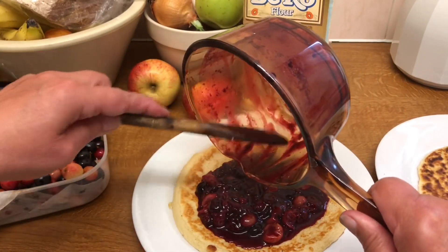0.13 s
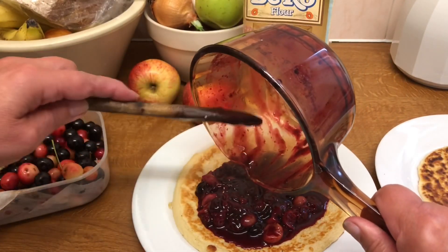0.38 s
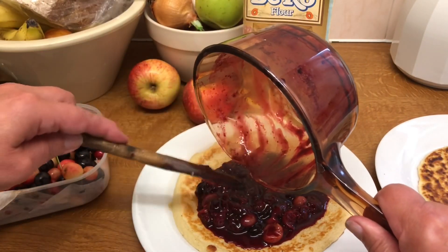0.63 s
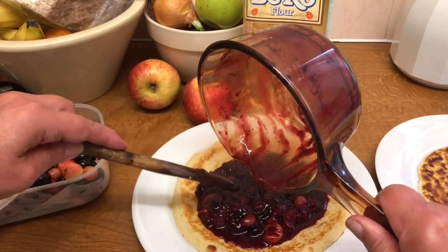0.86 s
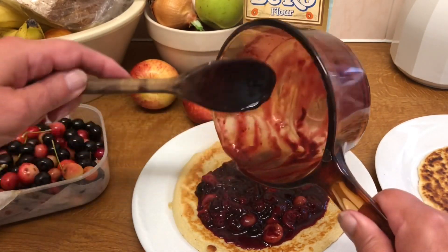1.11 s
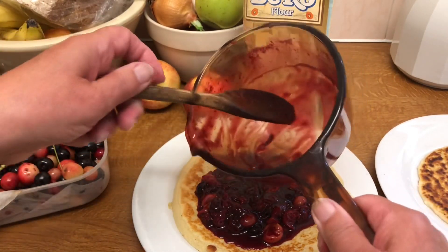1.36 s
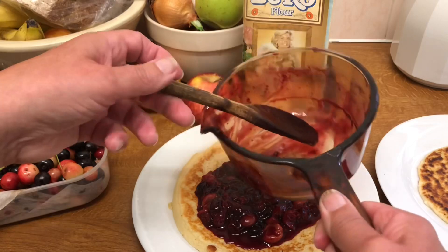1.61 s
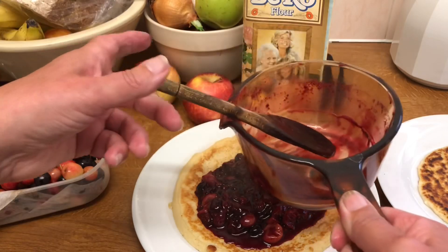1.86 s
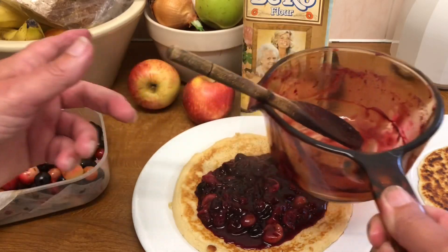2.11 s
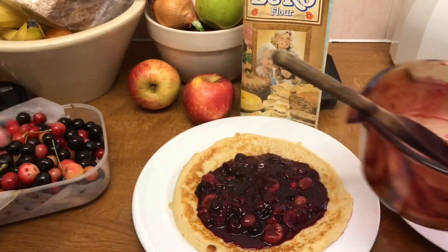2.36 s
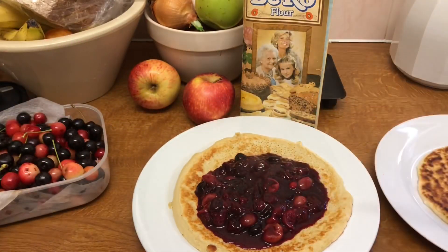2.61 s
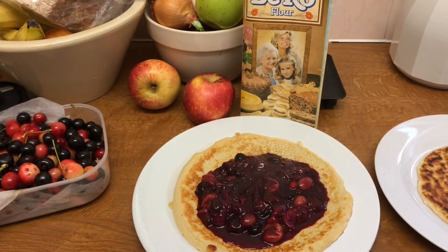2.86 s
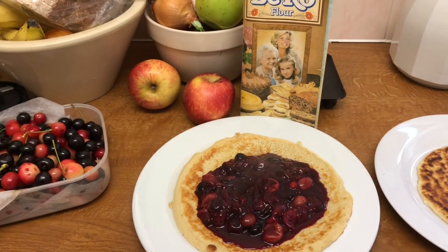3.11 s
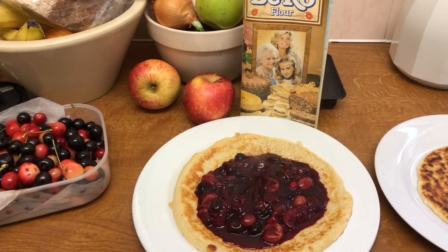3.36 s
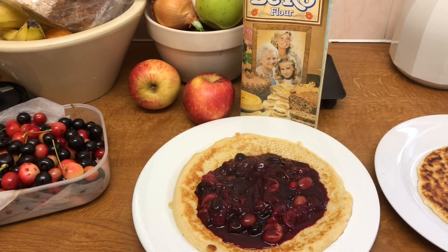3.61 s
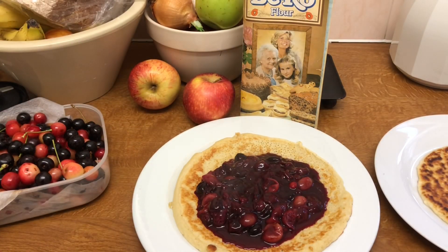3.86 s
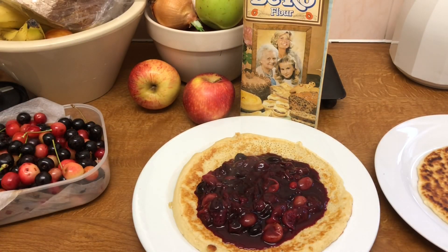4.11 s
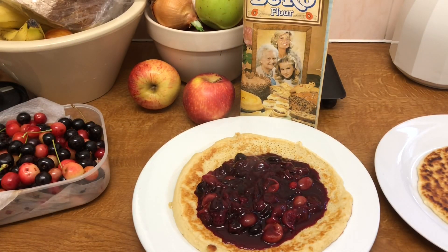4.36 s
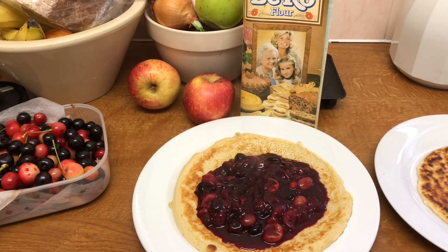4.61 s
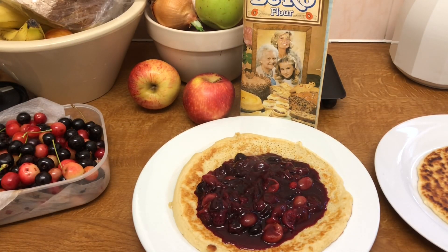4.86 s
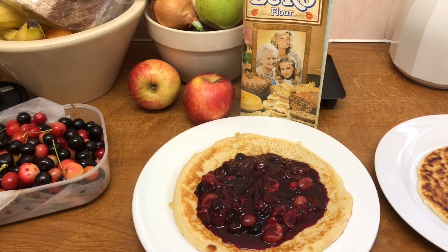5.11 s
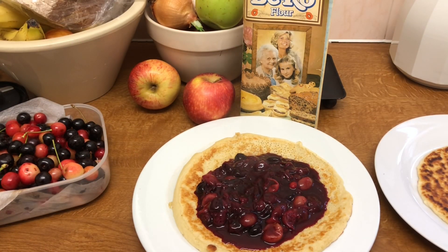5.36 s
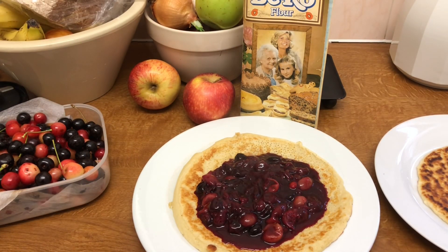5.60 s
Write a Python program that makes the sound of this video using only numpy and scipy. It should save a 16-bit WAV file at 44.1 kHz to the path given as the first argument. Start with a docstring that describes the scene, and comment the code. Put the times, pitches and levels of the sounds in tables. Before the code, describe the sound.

Small kitchen, phone microphone near the pan. First come dull glassy taps and brief wet wood-on-glass scrapes, then the brightest clatter as the spoon falls against the glass and bounces. A near-silent pause with tiny ticks follows, then off-screen woody thuds of a pan being set down, two of them strong, finishing with small rustles and a faint scrape over low hum and hiss.

```python
"""A wooden spoon taps and scrapes the sauce out of a hand-held glass saucepan, then drops into it and bounces.
Each tap rings damped glass modes and a hollow tok; scrapes are gritty noise that stirs the glass and squeaks.
Further off, heavy knocks of the pan being set down ring worktop panels and fill a small hard kitchen with echo.
Rustles and ticks are short filtered noise; shaped noise makes the low hum and hiss behind it all."""
import sys
import numpy as np
from scipy import signal
from scipy.fft import rfft, irfft
from scipy.io import wavfile
from scipy.ndimage import uniform_filter1d

SR = 44100
rng = np.random.default_rng(int(sys.argv[2]) if len(sys.argv) > 2 else 0)


def invert_db(level):
    """Linear amplitude ratio for a level in decibels (20 dB per decade), elementwise."""
    return 10 ** (np.asarray(level, dtype=float) / 20)


def to_wav(sig):
    """Store sig (one row per channel, or 1-D mono) as 16-bit WAV at the path in sys.argv[1].

    Samples outside -1..1 are clipped; the rate is SR.
    """
    pcm = np.clip(np.atleast_2d(sig), -1, 1) * 32767
    pcm = np.round(pcm).astype(np.int16)
    wavfile.write(sys.argv[1], SR, pcm.T)  # frames by channels


N = 252693
TIME = np.arange(N) / SR

# The saucepan in families of modes that share nodes; the hand and the sauce damp the bowl.
# Each row of a family: frequency in Hz, relative level in dB, 60 dB decay in s before modes() shortens it.
GLASS = [
    [(330, 1.5, 0.03), (433, -2.5, 0.049), (807, 9, 0.073), (927, 5.5, 0.14), (1390, 4.5, 0.022)],
    [(1540, -39, 0.03), (1740, 0.5, 0.013), (1840, -22, 0.085), (1826, 22.5, 0.021), (2052, 11, 0.021),
     (2200, -3.5, 0.059), (2500, -28, 0.0082)],
    [(3043, 9, 0.14)],
    [(3347, 20, 0.015), (3186, 8.5, 0.038), (3600, -6, .03)],
    [(3773, -4, 0.18)],
    [(4100, 1.5, 0.011), (4630, -0.5, 0.017), (4985, 9, 0.058), (5410, -2, 0.044)],
    [(5920, 9.5, 0.011), (6320, -10, 0.031), (6310, 5, 0.073), (6970, -14, 0.042)],
    [(8670, -9, 0.13), (8690, 5, 0.053), (10000, -15, 0.0097), (10500, -17, 0.0147), (11740, -9, .02),
     (14000, -16, .008)],
]


def unit(x):
    """Scale to rms 1."""
    return x / np.sqrt(np.mean(x ** 2))


def band(x, lo_hz, hi_hz):
    """Band-pass."""
    sos = signal.butter(2, [lo_hz, min(hi_hz, .45 * SR)], "band", fs=SR, output="sos")
    return signal.sosfilt(sos, x)


def modes(x, table, shorten=0.7, turn=1):
    """Ring a bank of damped resonators; a negative turn starts neighbours in opposite directions."""
    out = 0
    for k, (hz, db, t60) in enumerate(table):
        decay_s = min(t60, .6) * shorten
        pole = np.exp(2j * np.pi * hz / SR - np.log(1000) / (decay_s * SR))
        ring = signal.lfilter([0, pole.imag], [1, -2 * pole.real, abs(pole) ** 2], x)
        out = out + turn ** k * invert_db(db) * ring
    return out


def add(x, s, piece):
    """Mix a piece in at a time in seconds."""
    i = int(s * SR)
    x[i:i + len(piece)] += piece[:len(x) - i]


def push(ms):
    """Contact force of unit impulse that peaks after ms and relaxes; softer contact pushes longer."""
    t = np.arange(SR // 50) * 1000 / SR / ms
    force = t * np.exp(-t)
    return force / force.sum()


def crack(ms):
    """A burst of noise that dies 60 dB in ms."""
    t = np.arange(SR // 20) / SR
    return rng.standard_normal(len(t)) * 1000. ** (-t * 1000 / ms)


def grit(rate, spread_db):
    """Random clicks of uneven size, about rate per second, rms 1."""
    clicks = (rng.random(N) < rate / SR) * rng.standard_normal(N)
    return unit(clicks * invert_db(spread_db * rng.exponential(size=N)))


def stroke(start_s, length_s):
    """Pressure 0-1 of a stroke that presses on, holds and lets go."""
    rise_s, fall_s = 0.013, 0.027
    t = TIME - start_s
    press = np.clip(t / rise_s, 0, 1) ** 2
    return press * np.exp(-np.clip(t - length_s + fall_s, 0, None) / fall_s * 2)


def stutter():
    """Uneven grip: the level jumps about, 1.5 dB rms, as noise smoothed over 1/74 s."""
    return invert_db(1.5 * unit(uniform_filter1d(rng.standard_normal(N), int(SR / 74))))


def taps():
    """Each spot on the glass stirs the families of modes in its own mix; a harder or edge-on blow rings brighter."""
    # Spoon on glass. Each row: time in seconds, spot, tok peak in dB, tok pitch in Hz,
    # dB that all families but the lowest gain, dB that the spoon's hard edge adds.
    tap_rows = [(0.068, "lip", -27.5, 1094, -1, 5), (0.45, "sauce", -29, 1140, 10.5, 2.5),
                (0.57, "sauce", -38, 894, -7, 34), (0.593, "sauce", -27.5, 1020, -0.5, -5),
                (0.761, "sauce", -34, 1104, -3, 38.5), (1.383, "wall", -13.5, 1033, -1, 2),
                (1.717, "wall", -17.5, 1060, -0.5, 19), (1.764, "rim", -17.5, 1054, -0.5, 1),
                (1.892, "rim", -24.5, 1066, -11.5, 4), (5.477, "lip", -68, 1200, 3, 14)]
    # Where the spoon meets the pan. Each entry: tok decay in cycles before modes() shortens it,
    # level in dB above the tok for each family of GLASS.
    spot_mixes = {"lip": (9.5, [-10.5, 3.5, -13, -18, -28, -21, -20.5, -24]),
                  "sauce": (13.5, [-4.5, -19.5, -35, -42, -54, -59, -45.5, -37]),
                  "wall": (9.3, [-9.5, -4, -29, -10.5, -47, -6.5, -20, -28.5]),
                  "rim": (8.4, [-13.5, -1, -24, -2.5, -6.5, 0, -6.5, -29])}
    # How much of the edge's dB reaches each family of GLASS, as a factor.
    edge_shares = np.array([0.035, 0.056, 0.28, 0.3, 0, 0, 0.97, 0.27])
    out = np.zeros(N)
    kick = np.zeros(SR // 3)
    add(kick, 0, push(0.023))
    # a small pan radiates nothing far below each ring
    rings = [band(modes(kick, family, turn=-0.8), 0.89 * family[0][0], 15000) for family in GLASS]
    upper = np.arange(len(GLASS)) > 0
    for s, spot, db, tok_hz, upper_db, edge_db in tap_rows:
        cycles, mix_db = spot_mixes[spot]
        above_db = mix_db + upper_db * upper + edge_db * edge_shares
        # spoon drives wall, wall drives air, air drives the mouth: the tok swells, then soon stops
        cavity = [(tok_hz, 0, cycles / tok_hz)]
        tok = band(modes(modes(modes(kick, cavity), cavity), cavity), 620, 2700)
        for ring, more_db in zip([tok, *rings], [0, *above_db]):
            add(out, s - .001, invert_db(db + more_db) * ring / abs(ring).max())
        # the contact crack follows the highest family
        add(out, s - .001, invert_db(db + above_db[-1] + 8.5) * band(crack(23), 1500, 13700))
    return out


def scrapes():
    """Fine stick-slip grit hisses, stirs the glass and squeaks at a pitch that sinks along the stroke."""
    # Wet wood sliding on glass. Each row: start in seconds, length in seconds, relative level in dB,
    # squeak pitch at mid-stroke in Hz, relative level in dB of the glass singing along.
    scrape_rows = [(0.074, 0.13, -65.5, 6600, -25.5), (0.192, 0.085, -76.5, 6100, -25),
                   (0.482, 0.14, -68.5, 6380, -19), (0.782, 0.05, -66.5, 6450, -23.5),
                   (1.105, .2, -77, 6400, -23.5), (1.51, .07, -70.5, 6470, -18),
                   (1.565, 0.14, -76, 5800, -21.5), (5.454, .11, -77.5, 6380, -15.5)]
    # How well sliding stirs each family of GLASS, in dB.
    slide_db = [-38, -18, -26, -16, -9, -13, -8.5, -17]
    squeak_sag_hz_per_s = 1570
    grains = grit(2500, 2.0) * stutter()
    slip, singing, squeak = np.zeros((3, N))
    for s, length_s, db, squeak_hz, singing_db in scrape_rows:
        rub = grains * invert_db(db) * stroke(s, length_s)
        t = TIME - s
        slip += rub
        singing += rub * invert_db(singing_db)
        cycles = squeak_hz * t - squeak_sag_hz_per_s * t * (t - length_s) / 2
        # the rub smoothed over 5 ms sways the squeak's level
        sway = uniform_filter1d(rub, size=220) * invert_db(singing_db + 48.0)
        squeak += sway * np.cos(2 * np.pi * cycles)
    ring = sum(invert_db(own_db) * modes(singing, family) for own_db, family in zip(slide_db, GLASS))
    return band(slip, 4500, 14000) * invert_db(9.0) + ring + squeak


def knocks():
    """A heavy base lands on worktop panels: a dull push rings them, a hard edge marks the touch, the room booms."""
    # Knocks on the far worktop. Each row: first touch in seconds, relative level in dB,
    # share of the hollow surface 0-1, time to the peak of the push on the panels in ms, crack in dB.
    knock_rows = [(2.885, -48.5, 0.25, 0.55, -17), (2.98, -54, 0.4, 0.29, -11),
                  (3.676, -36.5, 0.42, 0.73, -39), (3.741, -38.5, 0.13, 0.99, -40),
                  (4.214, -52, 0.3, 0.37, -18), (4.248, -40, 0, 1, -34), (4.293, -19.5, 0.34, 0.5, -39.5),
                  (4.326, -61, 0.6, 0.59, -34), (4.626, -16, 0.69, 0.38, -65),
                  (5.038, -42.5, 0.67, 0.39, -26), (5.207, -60, 0.64, 0.17, -38)]
    # Worktop modes, solid and hollow. Each row: frequency in Hz, relative level in dB,
    # 60 dB decay in s before modes() caps and shortens it.
    solid_modes = [(101.5, -22.5, 3.5), (190, -4, 0.47), (280.8, -7, 0.5), (423, -15, 0.28),
                   (536, -8.5, 0.97), (867, -3, 0.82), (1062.5, -0.5, 0.61), (1310, -21, 0.18),
                   (1370, -7, 0.77), (1793, -36, 0.77), (2260, -3, 0.25)]
    hollow_modes = [(137, -13, 0.87), (359, -15, 0.97), (411.2, -4, 0.39), (620, -30, 0.14),
                    (850, -36, 0.33), (1124, 9.5, 0.057), (1174, -18, 5.0), (1260, -26, 0.36),
                    (1427, -9, 0.42), (1870, -21, 0.22), (1880, -8, 0.36), (2220, -34, 0.28)]
    # The kitchen's lowest standing waves, columns as above.
    boom_modes = [(47.7, -14, 0.36), (98, -2, 0.42)]
    # The pan's thick base, columns as above.
    base_modes = [(1110, 2.5, 0.038), (2080, -15, .03), (2830, -18, 0.024), (3400, -18, 0.018),
                  (4560, 0, 0.018), (5230, -9, 0.029), (6800, -20, .02)]
    settle_ms, first_touch_db = 3.5, -22  # the base lands on one edge, then flat
    base_db = -7.5
    boom_db = -32  # on each of two passes
    solid, hollow, thump, base = np.zeros((4, N))
    for first_s, db, share, ms, crack_db in knock_rows:
        share = np.clip(share, 0, 1)
        s = first_s + settle_ms / 1000
        blow = invert_db(db + 37) * (push(ms / 2) + invert_db(crack_db) * push(0.021))
        add(thump, first_s, invert_db(first_touch_db) * blow)
        add(thump, s, blow)
        add(solid, s, invert_db(db) * (1 - share) * push(ms))
        add(hollow, s, invert_db(db) * share * push(ms))
        add(base, s, invert_db(db + base_db) * share * push(ms / 4))
    panels = modes(solid, solid_modes, shorten=0.61, turn=-0.96)
    panels = invert_db(-0.5) * (panels + modes(hollow, hollow_modes, shorten=0.37, turn=-1.15))
    # two resonators in a row: standing waves build up after the blow
    drive = solid + invert_db(-10.5) * hollow
    boom = 0
    for hz, db, t60 in boom_modes:
        first = modes(drive, [(hz, boom_db, t60)])
        boom = boom + modes(first, [(hz, db + boom_db, t60)])
    return panels + boom + modes(base, base_modes, turn=-1.37), band(thump, 150, 10000)


def rustles():
    """Soft crinkles of cloth and hands moving: strokes of fine grit."""
    # Each row: start in seconds, length in seconds, level in dB.
    rustle_rows = [(4.981, 0.12, -65), (5.203, 0.045, -65), (5.243, .04, -68)]
    pressure = sum(invert_db(db) * stroke(s, length_s) for s, length_s, db in rustle_rows)
    return band(grit(3000, 2.1), 1000, 16400) * pressure


def ticks():
    """Faint dry ticks: noise bursts, each in a band of its own."""
    # Each row: time in seconds, level in dB, frequency in Hz that the band surrounds.
    tick_rows = [(2.1904, -59, 7510), (2.2732, -59, 11300), (2.3855, -54, 7200), (2.586, -54.5, 7600),
                 (5.009, -49, 11200), (5.037, -48, 10990), (5.2094, -71, 11100), (5.2644, -58, 11000),
                 (5.524, -62, 10900), (5.5548, -56, 12080)]
    out = np.zeros(N)
    for s, db, hz in tick_rows:
        add(out, s, invert_db(db) * band(crack(24), hz / 1.7, hz * 1.4))
    return out


def room(x, gap_ms):
    """Dense reflections that build up over gap_ms, each band dying at its own rate."""
    # The kitchen's echo. Each row: frequency in Hz, 60 dB decay in s.
    echo_rows = [(100, 0.62), (250, 0.46), (600, 0.34), (1500, 0.39), (4000, 0.35), (9000, 0.29),
                 (15000, 0.18)]
    t = np.arange(int(.6 * SR)) / SR
    tail = 0
    for hz, t60 in echo_rows:
        tail = tail + band(rng.standard_normal(len(t)), hz / 1.336, hz * 1.674) * 1000. ** (-t / t60)
    tail *= np.clip(t * 1000 / gap_ms, 0, 1) ** 2
    return signal.fftconvolve(x, tail / np.sqrt(np.sum(tail ** 2)))[:N]


def flutter(x, ms, db):
    """Sound bouncing between two facing walls: echoes every ms, each db weaker."""
    loop = np.zeros(int(ms * SR / 1000) + 1)
    loop[0], loop[-1] = 1, -min(invert_db(db), .9)
    return signal.lfilter([1], loop, x) - x


def air():
    """Appliance hum and hiss as noise shaped in frequency; the bass wavers slowly."""
    # Each row: frequency in Hz, relative level in dB per Hz.
    air_rows = [(15, -59), (25, -33), (43, 1), (70, -7.5), (102, 3.5), (123, -3), (317, -7), (394, -10.5),
                (476, -10.5), (863, -16), (962, -15.5), (1840, -22), (7710, -29), (16000, -33)]
    hz = np.fft.rfftfreq(N, 1 / SR) + 1
    f, db = np.transpose(air_rows)
    shape = invert_db(np.interp(np.log(hz), np.log(f), db))
    noise = unit(irfft(rfft(rng.standard_normal(N)) * shape, N))
    waver = unit(uniform_filter1d(rng.standard_normal(N), SR // 4))
    return invert_db(-59.5) * (noise + (invert_db(0.35 * waver) - 1) * band(noise, 40, 400))


def scene():
    """The pan is close and fairly dry, the knocks far and mostly echo."""
    near = taps() + scrapes() + rustles() + ticks()
    # the pan's mouth spreads its low tones round the kitchen; the rim tones beam at the listener
    spread = band(near, 180, 4500) + invert_db(4) * near
    echoes = invert_db(-14.5) * room(spread, gap_ms=3.9)
    echoes += invert_db(-20) * flutter(band(near, 600, 2100), 11.0, -13.0)
    panels, thump = knocks()
    far_echo = room(invert_db(4.0) * band(panels, 340, 4000) + thump, gap_ms=0.33)
    far = panels + 0.35 * thump + far_echo  # part of the thump arrives straight
    return (near + echoes + far + air())[None]


def band_limit(x):
    """A steep low-pass at the top of the band."""
    return signal.sosfilt(signal.butter(12, 16680, fs=SR, output="sos"), x)


def record(dry):
    """A phone microphone that trims the deep bass below 45 Hz."""
    trimmed = signal.sosfilt(signal.butter(2, 45, "high", fs=SR, output="sos"), dry)
    return band_limit(trimmed)


dry = scene()
out = record(dry)
to_wav(out)
```